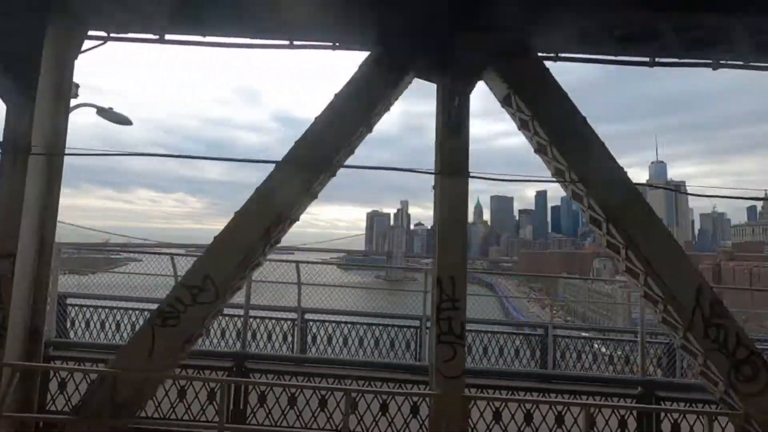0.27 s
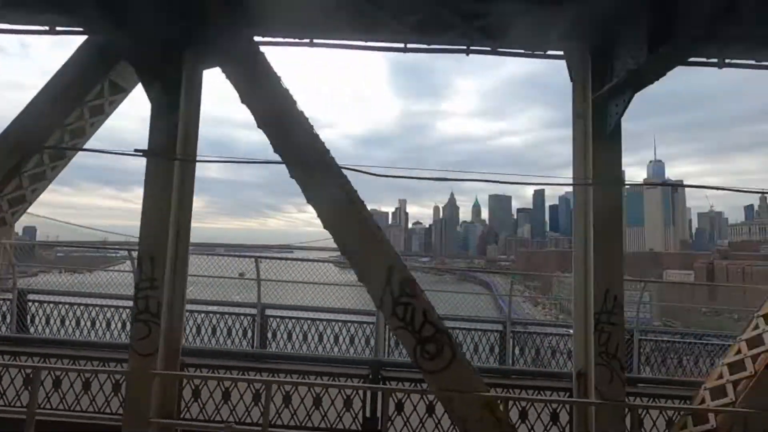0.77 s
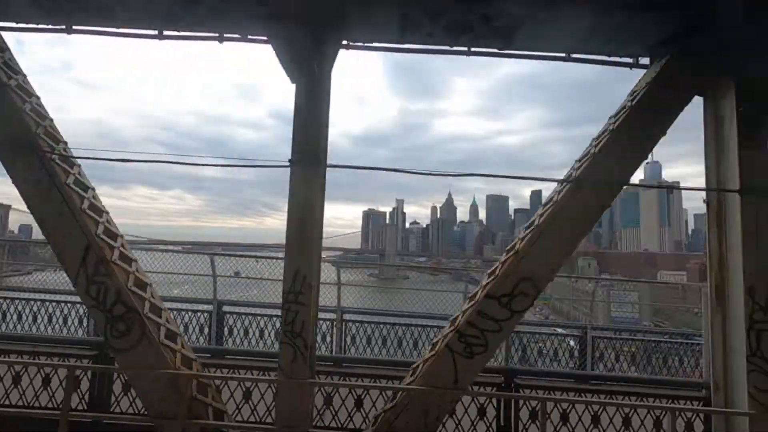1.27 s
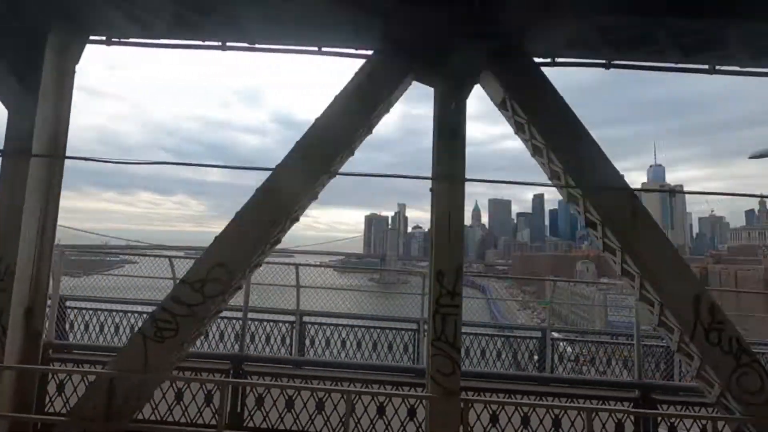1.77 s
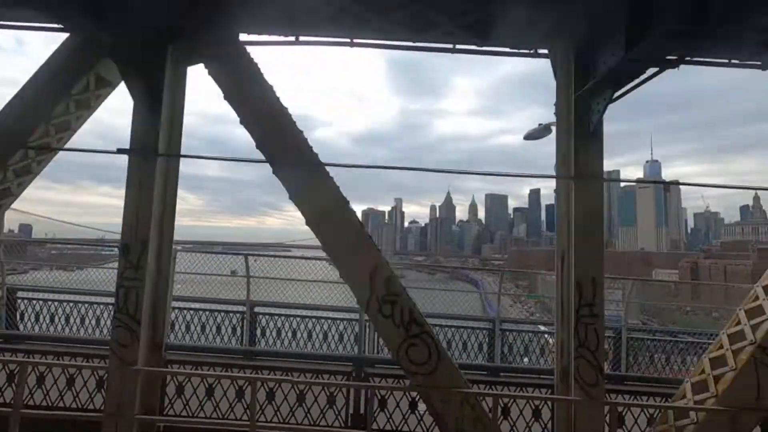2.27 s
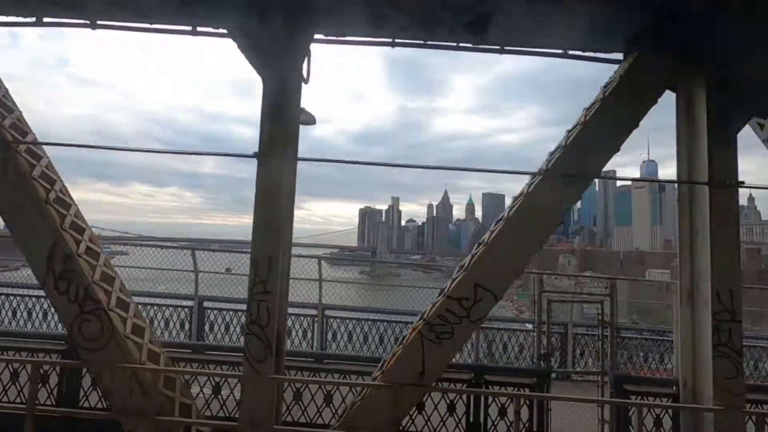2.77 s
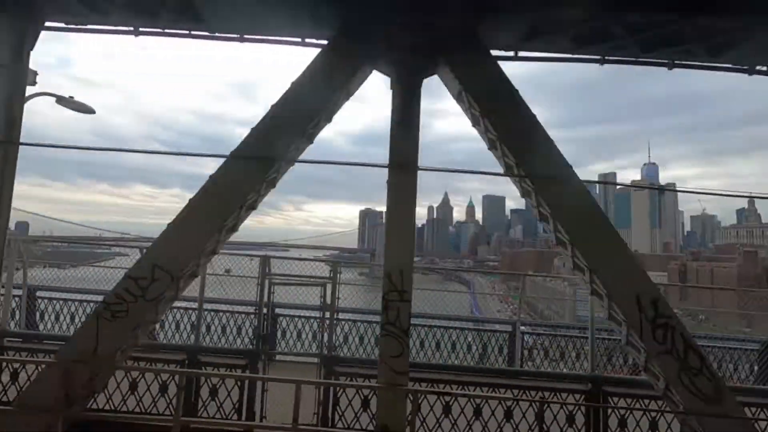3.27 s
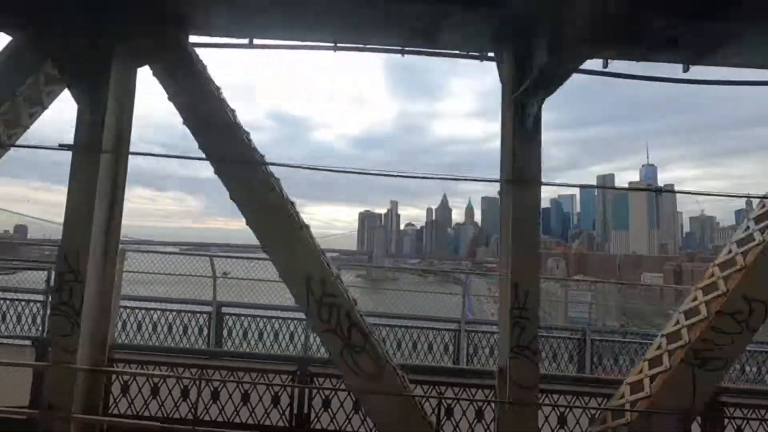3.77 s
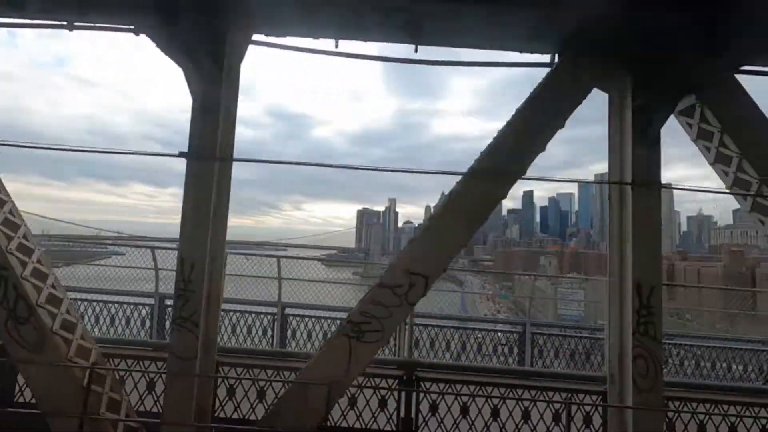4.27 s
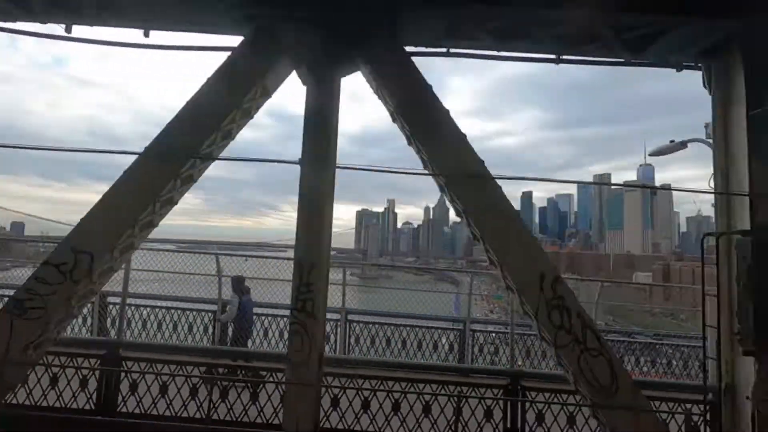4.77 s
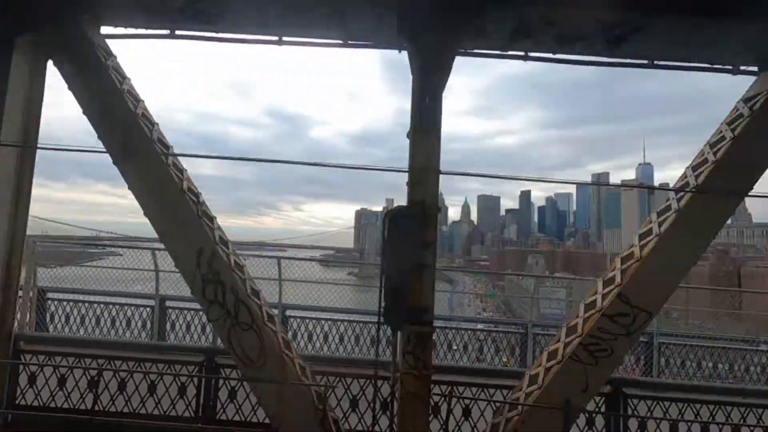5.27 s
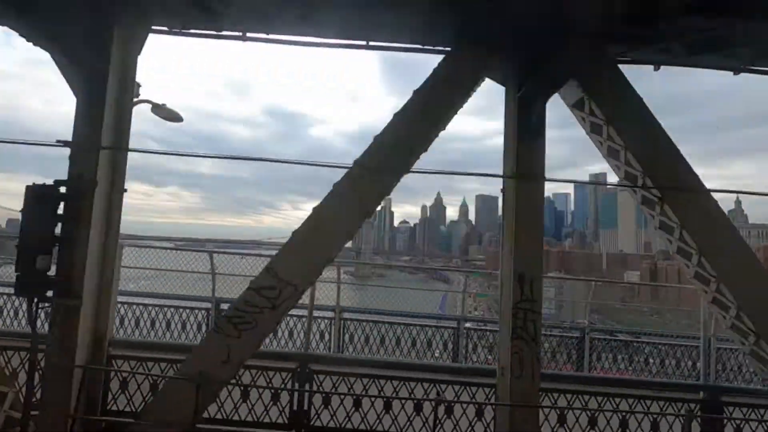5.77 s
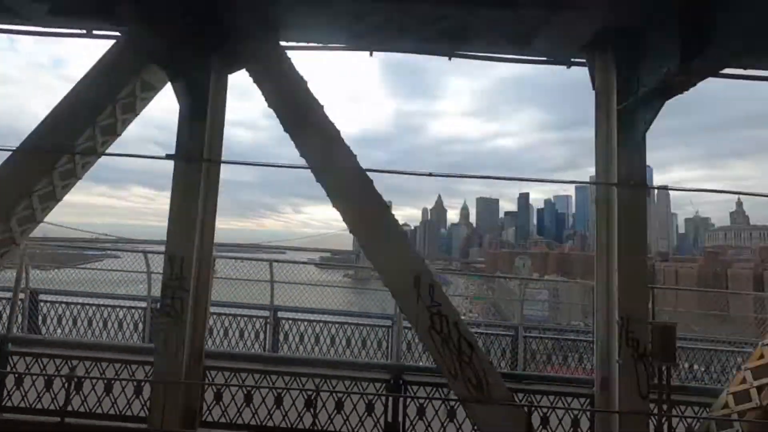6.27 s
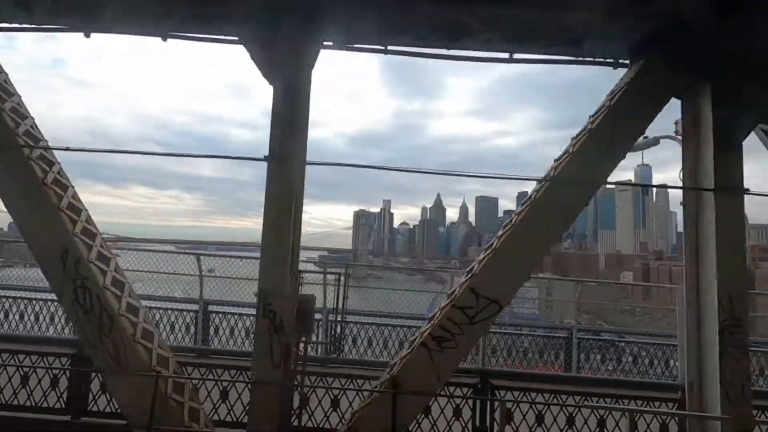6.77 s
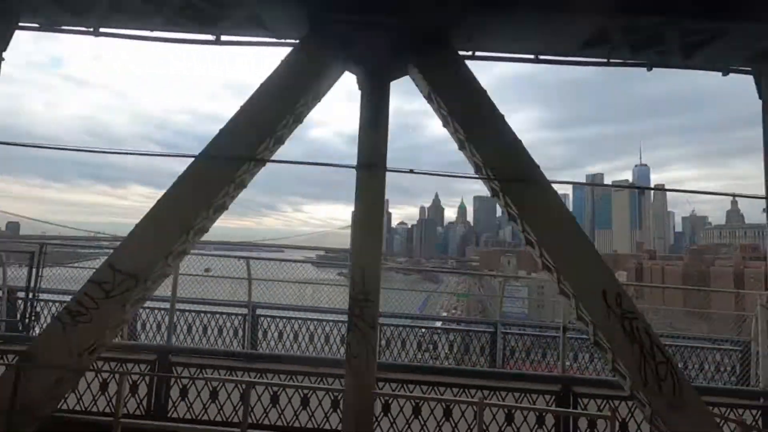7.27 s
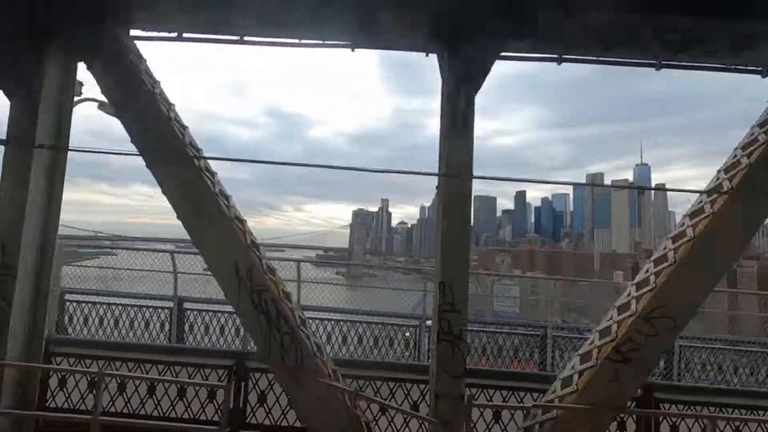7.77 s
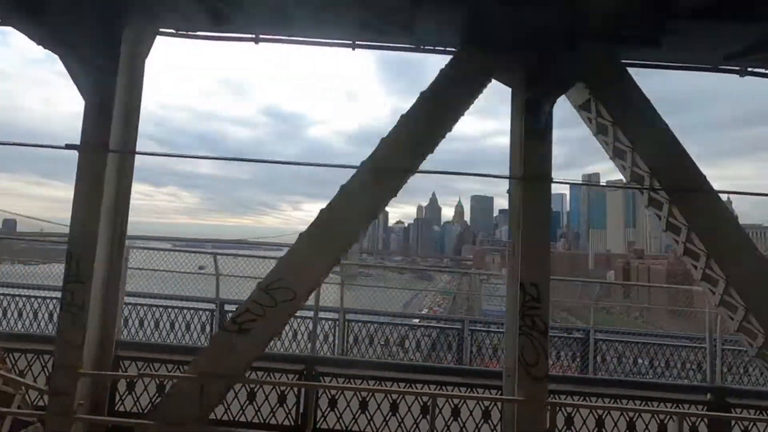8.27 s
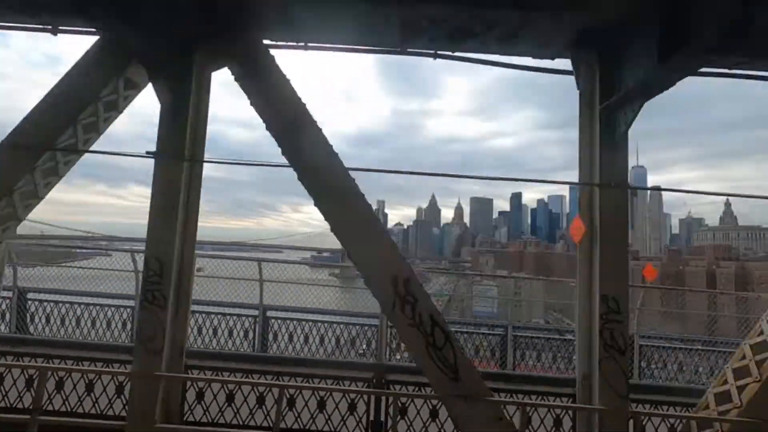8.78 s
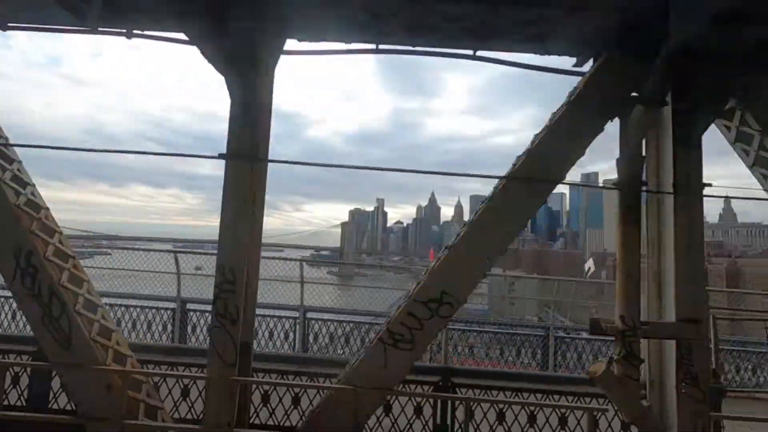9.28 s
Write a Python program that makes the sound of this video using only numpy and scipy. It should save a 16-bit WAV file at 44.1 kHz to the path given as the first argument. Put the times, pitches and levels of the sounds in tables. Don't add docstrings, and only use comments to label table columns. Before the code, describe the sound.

Loud rolling train interior on a steel truss bridge: girders boom, panels buzz, wheels grind and clack over joints, with a brief metallic squeak midway.

```python
import sys
import numpy as np
from scipy import signal
from scipy.fft import rfft, irfft
from scipy.io import wavfile
from scipy.ndimage import uniform_filter1d

SR = 44100
rng = np.random.default_rng(int(sys.argv[2]) if len(sys.argv) > 2 else 0)


def transcribe(u):
    v = np.clip(np.atleast_2d(u).T, -1, 1)
    q = np.round(v * 32767).astype(np.int16)
    wavfile.write(sys.argv[1], SR, q)


def attenuation_scalar(level_db):
    decades = np.asarray(level_db, float) / 20
    return 10 ** decades


N = 419832
TIME = np.arange(N) / SR
USUAL_ROAR_DB = -31


def evened(x):
    return x / np.sqrt(np.mean(abs(x) ** 2) + 1e-20)


def read(points, hz):
    f, *values = np.transpose(points)
    return [np.interp(np.log(hz + 1), np.log(f + 1), v) for v in values]


def shaped(points):
    return lambda hz: attenuation_scalar(read(points, hz)[0])


def follow(rows, t):
    s, *columns = np.transpose(rows)
    return [np.interp(t, s, c) for c in columns]


def bells(rows):
    t = np.arange(0, N + 64, 64) / SR
    s, half, *heights = np.transpose(rows)[:, :, None]
    bell = np.exp(-((t - s) / np.maximum(half, .01)) ** 2)
    return [np.interp(TIME, t, (h * bell).sum(0)) for h in heights]


def flutter(per_s):
    spectrum = rfft(rng.standard_normal(N))
    hz = np.fft.rfftfreq(N, 1 / SR)
    return evened(irfft(spectrum / (1 + (hz / per_s) ** 4), N))


# f/Hz, likeness [0-1], phase lead of left/rad, level of left over right/dB
PORT_PAIR = [(60, .997, 0, .6), (200, .996, -.05, 1.0), (380, .97, -.11, 1.5), (900, .82, -.33, 1.3),
             (1700, .88, -.3, 3.1), (2150, .6, -.6, 3.5), (2420, .32, -.5, -1.6), (2670, .38, -1.3, -4.6),
             (3100, .56, -1.6, .3), (3700, .48, -.8, .4), (4750, .12, -1.3, -5.0), (5900, .25, -3.7, .3),
             (8600, .5, -3.1, 1.0), (11000, .1, -3.1, 0)]


def noise(colour):
    hz = np.fft.rfftfreq(N, 1 / SR)
    same, lead, lean_db = read(PORT_PAIR, hz)
    same = np.clip(same, 0, 1)
    a, b, c, d = rng.standard_normal((len(hz), 4)).T
    right = a + 1j * b
    stray = c + 1j * d
    left = (same * right + np.sqrt(1 - same ** 2) * stray) * np.exp(1j * lead)
    ports = np.array([left * attenuation_scalar(lean_db / 2), right / attenuation_scalar(lean_db / 2)])
    pair = irfft(colour(hz) * ports, N)
    return pair / np.sqrt(np.mean(pair.mean(0) ** 2))


# t/s, load on the girders level/dB, floor's share/dB, sway of the body/dB
CAR_SHAKING = [(0, -20.5, 0.5, -2.5), (.5, -21.5, 0, 1), (1.1, -20, 0.5, 2), (1.85, -23.5, -1, -1),
               (2.2, -18, 0, -4.5), (3.25, -21, -1, 4), (3.6, -18.5, 0.5, -1.5), (4.0, -24, 1.5, 0.5),
               (4.4, -17.5, 0, -3.5), (5.2, -21, 0.5, 0.5), (5.8, -22, 2, -3.5), (6.35, -22.5, -2, 0.5),
               (6.85, -21.5, 3, 2.5), (7.25, -19.5, -0.5, -2), (7.9, -25, 1, -1), (8.45, -20.5, 1, -1),
               (9.15, -21, 0, -2.5), (9.52, -21.5, 4.5, 3)]


def shaking():
    return follow(CAR_SHAKING, TIME)


# middle t/s, boom level/dB, sway level/dB
LOW_SWELLS = [(.06, 2.5, -1), (.24, 3, -2), (.57, -2, 1.5), (.72, 0, 1), (.98, -0.5, 4.5), (1.2, 1, -3),
              (1.31, -2, -0.5), (1.44, 3, -2.5), (1.8, -1, 2.5), (2.35, 0, -2), (3.0, 1.5, 1),
              (3.23, -0.5, 2.5), (3.41, -4.5, -3.5), (3.58, 1.5, 0), (4.2, 1, -0.5), (4.4, 2.5, -4),
              (4.74, 0, 3), (5.22, 1.5, 0), (5.85, -2.5, -2), (6.05, 1, -1), (6.52, 3.5, -1.5),
              (6.7, -1.5, 4.5), (7.13, -0.5, -1), (7.27, 2, -3), (7.93, 0, 3.5), (8.15, -3.5, 0),
              (8.55, 1.5, -6), (8.67, -2.5, 3), (9.1, 1, 0), (9.41, -3, 3.5)]


def low_swells():
    half_s = .06
    return bells([(s, half_s, boom_db, sway_db) for s, boom_db, sway_db in LOW_SWELLS])


# middle t/s, level/dB, half length/s
WALL_JOLTS = [(.4, -3, 0.12), (0.66, -1, .04), (0.836, 2, .05), (1.056, 3.5, 0.031), (1.12, -4, 0.039),
              (1.326, 4, 0.055), (1.595, -1.5, .1), (2.3, -1, .06), (2.75, 4.5, 0.037), (3.1, 4, 0.037),
              (3.32, -4, .06), (4.05, -1, 0.064), (4.453, -2, .1), (4.95, -1, 0.041), (5.294, -3, .08),
              (5.56, 2, .05), (5.755, 1.5, 0.055), (6.01, 2, 0.025), (6.225, 1.5, .06), (6.42, 1.5, 0.067),
              (6.817, 0.5, 0.096), (7.25, -3.5, 0.032), (7.497, 3.5, 0.11), (7.805, 2.5, 0.051),
              (8.08, -2, 0.025), (8.3, 3.5, 0.056), (8.502, 3.5, 0.1), (8.673, -3.5, 0.037),
              (9.058, 2, 0.047), (9.387, -1, 0.069)]


def jolts():
    return bells([(s, half, db) for s, db, half in WALL_JOLTS])[0]


# f/Hz, width/Hz, level/dB
PANEL_RINGS = [(44, 12, 0.5), (77, 23, 2), (103.4, 19, 5), (121, 11, -7), (136, 20, 1.5), (169.8, 18, 3.5),
               (199, 9.8, -5.5), (217.4, 11, 5), (306, 15, 0), (345, 5.4, -5)]


def structure(points):
    def colour(hz):
        rings_db = sum(db / (1 + (2 * (hz - f) / width) ** 2) for f, width, db in PANEL_RINGS)
        return shaped(points)(hz) * attenuation_scalar(rings_db)
    return noise(colour)


# f/Hz, level/dB per Hz
SWAY_SPECTRUM = [(8, -21), (13, -11), (25, -3.5), (45, -1), (55, -3), (70, -26.5), (120, -100)]


def car_sway(sway_db):
    lurch_db, lurch_per_s = 2.7, 3
    return attenuation_scalar(-24 + sway_db + lurch_db * flutter(lurch_per_s)) * structure(SWAY_SPECTRUM)


# f/Hz, level/dB per Hz
BOOM_SPECTRUM = [(30, -100), (45, -31), (55, -4), (80, 1), (110, -7), (140, -29), (250, -100)]


def girders(boom_db):
    return attenuation_scalar(boom_db) * structure(BOOM_SPECTRUM)


# f/Hz, level/dB per Hz
DRUM_SPECTRUM = [(60, -100), (95, -22), (115, -3.5), (165, -4), (200, -5.5), (250, -31.5), (400, -100)]


def floor_drum(floor_db, extra_db, jolt_db):
    level_db = -23.5 + floor_db + 0.36 * extra_db + .5 * jolt_db
    return attenuation_scalar(level_db) * structure(DRUM_SPECTRUM)


# f/Hz, level/dB per Hz
BUZZ_SPECTRUM = [(100, -100), (160, -23), (200, -3.5), (225, 0), (349, -4), (420, -16), (550, -39.5),
                 (920, -120)]


def panel_buzz(floor_db, extra_db, jolt_db):
    level_db = -24 + .6 * floor_db + .45 * extra_db + jolt_db
    return attenuation_scalar(level_db) * structure(BUZZ_SPECTRUM)


def body(force_db, jolt_db):
    boom_db, floor_db, sway_db = shaking()
    boom_swell_db, sway_swell_db = low_swells()
    extra_db = force_db - USUAL_ROAR_DB
    low = girders(boom_db + boom_swell_db) + car_sway(sway_db + sway_swell_db)
    return low + floor_drum(floor_db, extra_db, jolt_db) + panel_buzz(floor_db, extra_db, jolt_db)


# t/s, level/dB, f/Hz, decay by 60 dB/s
PLATE_CLANGS = [
    (8.17, -31, 900, 0.36),
    (8.18, -29, 380, .3),
    (3.09, -37, 1100, .3),
    (2.4, -32, 3400, 0.12),
]
# t/s, level/dB, f/Hz, length/s
FITTING_SQUEAK = [
    (5.341, -27.5, 3390, 0.012),
    (5.358, -31, 3400, 0.021),
    (5.381, -32, 3370, 0.0085),
    (5.391, -33, 3370, 0.013),
]


def fittings():
    out, t = np.zeros(N), np.arange(SR // 2) / SR
    for s, db, hz, t60 in PLATE_CLANGS:
        shape = (1 - np.exp(-t / 0.0046)) * attenuation_scalar(db - 60 * t / t60)
        out[round(s * SR):][:len(t)] += shape * np.sin(2 * np.pi * hz * t)
    for s, db, hz, length in FITTING_SQUEAK:
        u = t[:round(length * SR)]
        swell = attenuation_scalar(db) * np.sin(np.pi * u / length)
        out[round(s * SR):][:len(u)] += swell * np.sin(2 * np.pi * hz * (s + u))
    return out * attenuation_scalar(np.array([[1.5], [-1.5]]))


# t/s, blow level/dB, ring time/s, brightness (bright layer up, dull layer down)/dB
JOINT_BLOWS = [(0.7594, -14.5, 0.83, 0.5), (1.6594, -15.5, 0.51, -3.5), (2.1294, -14, 0.76, -1.5),
               (2.4594, -15.5, 0.46, -7), (2.6723, -15, 0.5, 5), (3.0799, -19, 0.34, -2),
               (3.9584, -12.5, 0.44, 5.5), (4.2394, -17, 0.42, -4.5), (4.9287, -16, 0.5, 6),
               (5.447, -11, 0.81, -2.5), (5.6994, -18.5, 0.41, 10.5), (6.0194, -15.5, 0.72, 6.5),
               (6.2694, -19.5, 0.5, 0), (6.5294, -25, 0.46, -1.5), (6.8594, -22.5, 0.22, 4.5),
               (8.1754, -19, 0.36, -5), (8.4194, -21.5, 0.32, 7), (8.9794, -15, 0.33, 1.5)]
# f/Hz, level/dB per Hz
CLATTER_SPECTRUM = [(240, -33), (400, -5), (1180, -8), (1780, -5.5), (2620, -4), (4490, -19), (8000, -35.5),
                    (9500, -100)]


def joints():
    t, out = np.arange(SR // 2) / SR, np.zeros((2, N + SR))

    def tilted(tilt):
        return noise(lambda hz: shaped(CLATTER_SPECTRUM)(hz) * (hz / 2000 + .01) ** tilt)

    dull, bright = tilted(-.5), tilted(.5)
    for s, blow_db, t60, bright_db in JOINT_BLOWS:
        at = round(s * SR)
        span = slice(at, at + len(t))
        shape = (1 - np.exp(-t / 0.014)) * attenuation_scalar(blow_db - 18.5 - 60 * t / max(t60, .05))
        out[:, span] += shape * (dull[:, span] / attenuation_scalar(bright_db) + bright[:, span] * attenuation_scalar(bright_db))
    return out[:, :N]


# t/s, roar level/dB
RAIL_ROUGHNESS = [(0, -32), (.68, -34.5), (.8, -32), (1.4, -31), (1.8, -33), (2.4, -31.5), (2.65, -31),
                  (3.4, -30), (3.8, -31.5), (4.4, -30.5), (4.7, -31.5), (5.6, -29.5), (6.7, -30.5),
                  (7.25, -33.5), (7.45, -36), (8.1, -33.5), (9.0, -31), (9.52, -34)]
# middle t/s, force level/dB, half length/s, lean to the growl/dB
RAIL_PATCHES = [(0.098, 0.5, 0.029, 0), (0.817, 0, 0.034, -3), (0.99, 2.5, 0.049, -2),
                (1.57, -4.5, 0.11, -2.5), (1.713, 2, 0.048, -0.5), (2.162, 2, 0.042, -1),
                (2.344, -2.5, 0.063, 0), (2.522, 1, 0.077, -4.5), (2.793, 2, .06, 2.5), (3.14, 4, .05, 3),
                (3.968, 4, 0.043, -0.5), (4.27, 2.5, 0.055, 1.5), (4.73, -2.5, 0.035, -1.5),
                (4.971, 1, 0.062, 1), (5.143, -2.5, .03, 0.5), (5.195, 1, .04, -2), (5.389, -4, .04, -1),
                (5.52, -1, .05, -2), (5.805, 2.5, 0.074, -0.5), (6.046, 4, 0.035, 2.5),
                (6.195, -4, 0.05, 0), (6.328, 3, 0.062, -0.5), (6.471, -1, 0.044, 1.5),
                (6.583, 4, 0.073, 1), (6.91, 2.5, 0.068, 1.5), (7.196, 3, 0.073, -0.5),
                (8.218, 4, 0.066, 4), (8.463, 4.5, 0.095, 2), (8.687, -4, 0.046, 1), (9.114, 2, .07, 1)]


def contact():
    patch_db, lean_db = bells([(s, half, db, lean) for s, db, half, lean in RAIL_PATCHES])
    return follow(RAIL_ROUGHNESS, TIME)[0] + patch_db, lean_db


# t/s, song level/dB re roar
STRIKES = [(.78, -17), (.95, -21), (2.58, -16), (2.75, -29), (3.24, -26), (3.92, -23), (4.88, -30),
           (5.45, -16), (5.68, -23), (6.0, -35), (6.27, -30), (6.5, -34), (7.16, -31), (8.17, -23)]


def rim_song():
    hum_db, rise_s, t60_s = -41.5, .03, 0.98
    power, t = np.full(N, attenuation_scalar(hum_db) ** 2), np.arange(SR) / SR
    for s, db in STRIKES:
        ring = (1 - np.exp(-t / rise_s)) * attenuation_scalar(db - 60 * t / t60_s)
        part = power[round(s * SR):][:SR]
        part += (ring ** 2)[:len(part)]
    return np.sqrt(power)


def rim():
    song = noise(lambda hz: 1 / (1 + ((hz - 6120) / 120) ** 2))
    scrape = noise(lambda hz: 1 / (1 + ((hz - 5400) / 700) ** 4)) * attenuation_scalar(5.5)
    return (song + scrape) * rim_song() * attenuation_scalar(-6)


def rail_and_web():
    modes = noise(lambda hz: sum(1 / (1 + ((hz - f) / 30) ** 2) for f in (1620, 1740)))
    return modes * attenuation_scalar(-11.5 + 1.7 * flutter(4.8))


# f/Hz, level/dB per Hz
GROWL_SPECTRUM = [(250, -34), (420, -0.5), (516, -4), (780, -6), (859, -7.5), (1200, -10), (1560, -37.5),
                  (2640, -120)]
ROAR_SPECTRUM = [(710, -26.5), (1200, -8), (1400, -1.5), (1750, -0.5), (2220, -3.5), (2680, -1.5),
                 (3500, -11.5), (4700, -55)]
FIZZ_SPECTRUM = [(2700, -38.5), (3500, -2.5), (4190, -4), (5180, -12), (6200, -17.5), (7800, -22),
                 (8300, -32.5), (9000, -69)]
AIR_SPECTRUM = [(8000, -58), (8400, 3.5), (9300, -1.5), (11000, -12), (14000, -16), (16000, -57.5)]


def rolling(roar_db, lean_db):
    extra_db, tremor = roar_db - USUAL_ROAR_DB, flutter(9.6)
    growl_db = -1.5 - 0.47 * extra_db + lean_db + .1 * tremor
    fizz_db = -13.5 + 0.27 * extra_db + 0.24 * tremor
    growl = noise(shaped(GROWL_SPECTRUM)) * attenuation_scalar(growl_db)
    roar = noise(shaped(ROAR_SPECTRUM)) * attenuation_scalar(0.12 * tremor)
    air = attenuation_scalar(-31.5) * noise(shaped(AIR_SPECTRUM))
    fizz = (noise(shaped(FIZZ_SPECTRUM)) + air) * attenuation_scalar(fizz_db)
    return attenuation_scalar(roar_db - 1.0) * (growl + roar + rail_and_web() + fizz + rim())


def scene():
    force_db, lean_db = contact()
    jolt_db = jolts()
    wheels = rolling(force_db, lean_db + 0.16 * jolt_db)
    return body(force_db, jolt_db) + fittings() + joints() + wheels


def limited(x):
    power_db = 10 * np.log10(abs(uniform_filter1d((x ** 2).mean(0), 300)) + 1e-12)
    fall = np.arange(N) * 160.0 / SR
    over_db = np.maximum(np.maximum.accumulate(power_db + fall) - fall + 17, 0)
    return x * attenuation_scalar(2.5 - 0.37 * uniform_filter1d(over_db, 200))


def gated(x):
    gate_hz, band_hz, open_share = 8150, 340, .68
    notch_hz, notch_share = (8300, 9100), np.array([.06, .5])
    mid_side = np.array([x[0] + x[1], x[0] - x[1]]) / 2
    hz, t, z = signal.stft(mid_side, SR, nperseg=2048)
    band = (hz // band_hz).astype(int)
    in_notch = (hz > notch_hz[0]) & (hz < notch_hz[1])
    share = np.where(in_notch, notch_share[:, None], open_share)
    kept = rng.random((len(t), band[-1] + 1, 2)).T[:, band] < share[:, :, None]
    kept = kept | (hz < gate_hz)[:, None]
    mid, side = signal.istft(z * kept, SR, nperseg=2048)[1][:, :N]
    return np.array([mid + side, mid - side])


def low_pass(x):
    return signal.sosfilt(signal.butter(12, 14233, fs=SR, output="sos"), x)


def record(dry):
    open_s = .003
    ends = np.clip(np.minimum(np.arange(N), N - np.arange(N)) / (open_s * SR), 0, 1)
    mix = gated(0.91 * np.tanh(ends * limited(dry) / 0.93))
    return low_pass(mix)


dry = scene()
out = record(dry)
transcribe(out)
```